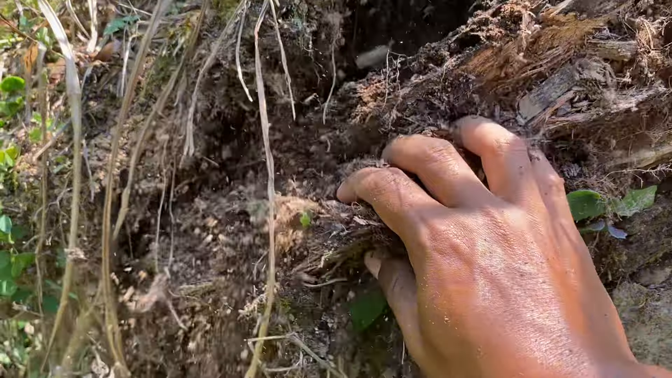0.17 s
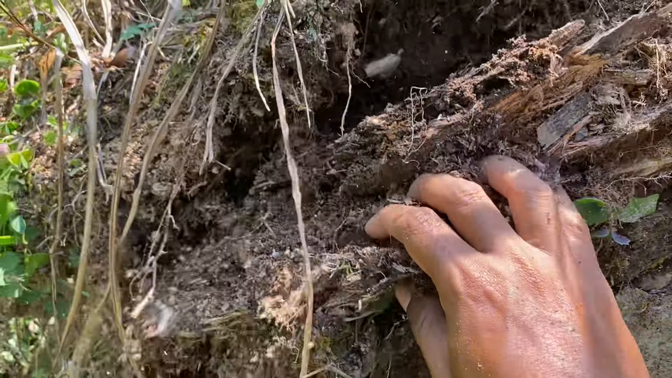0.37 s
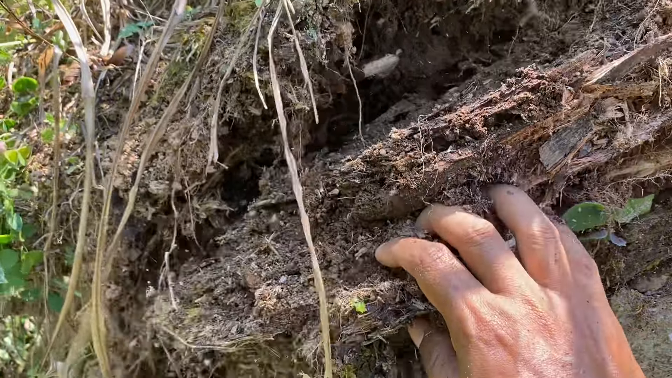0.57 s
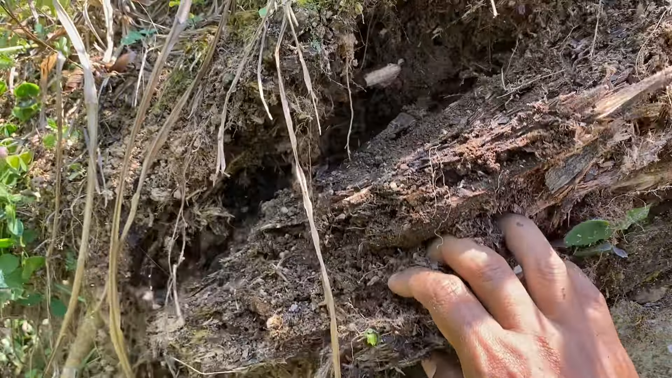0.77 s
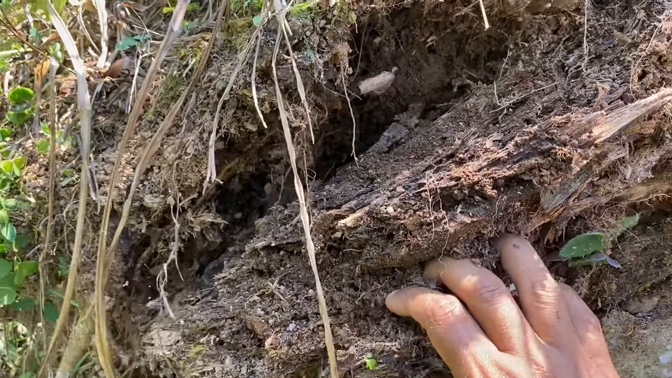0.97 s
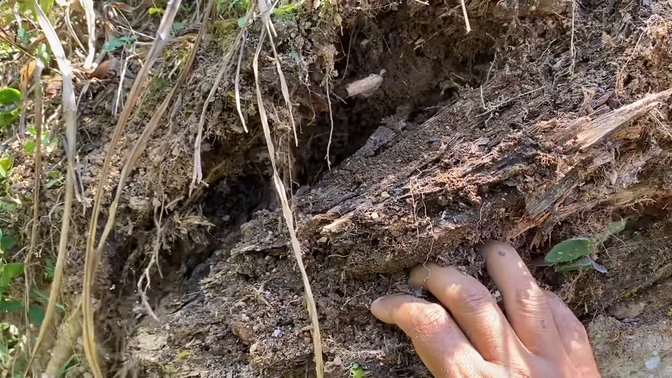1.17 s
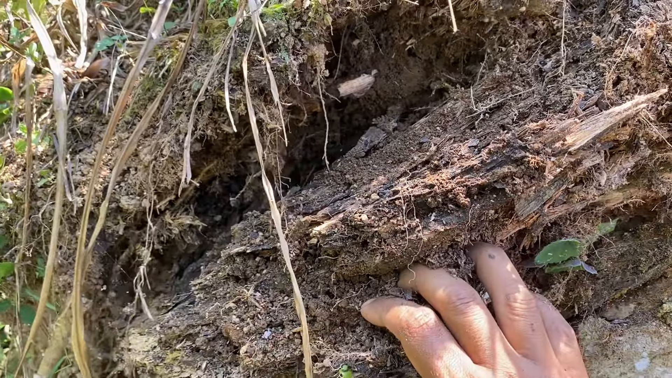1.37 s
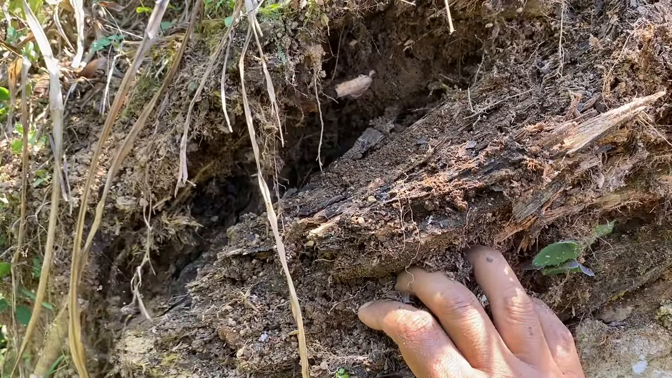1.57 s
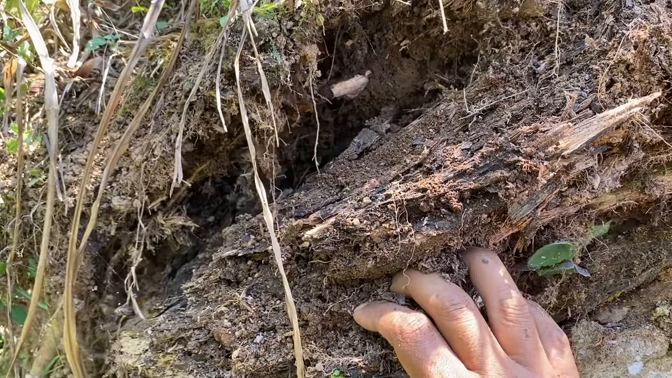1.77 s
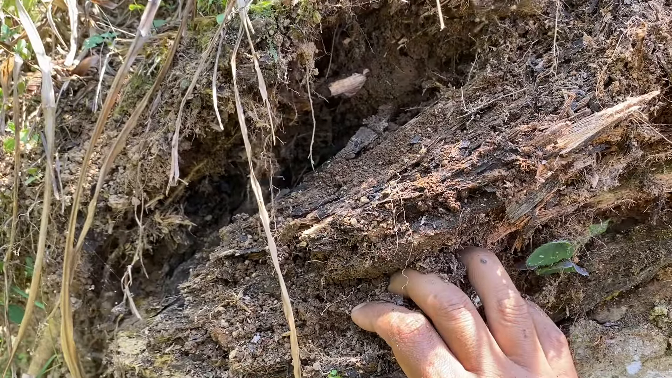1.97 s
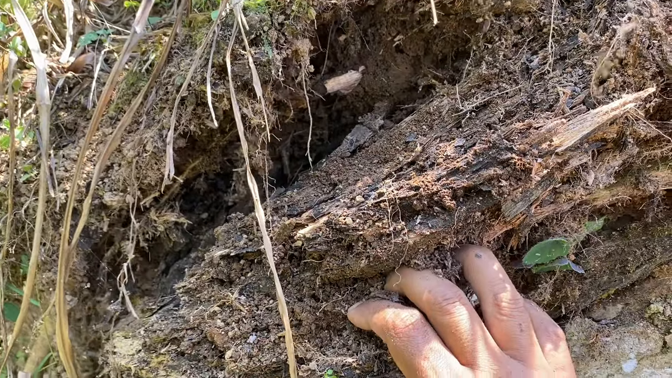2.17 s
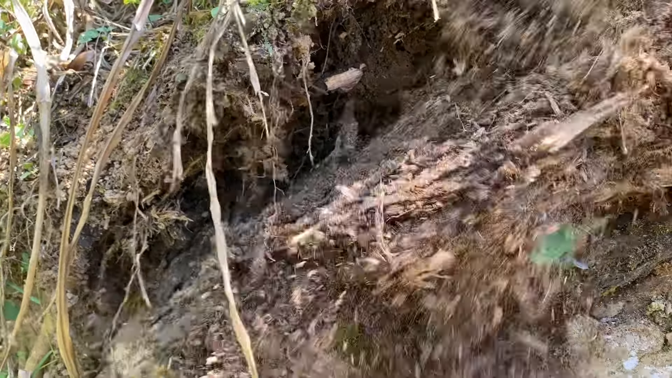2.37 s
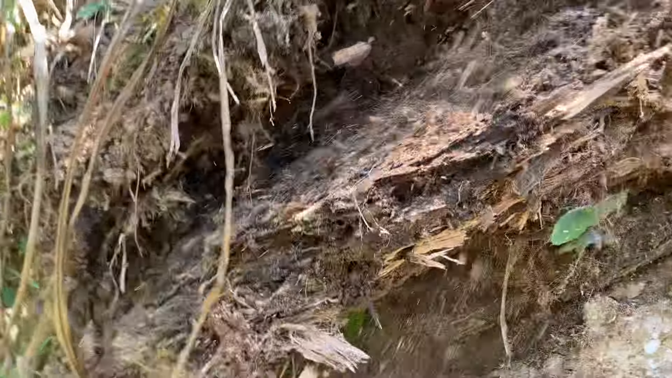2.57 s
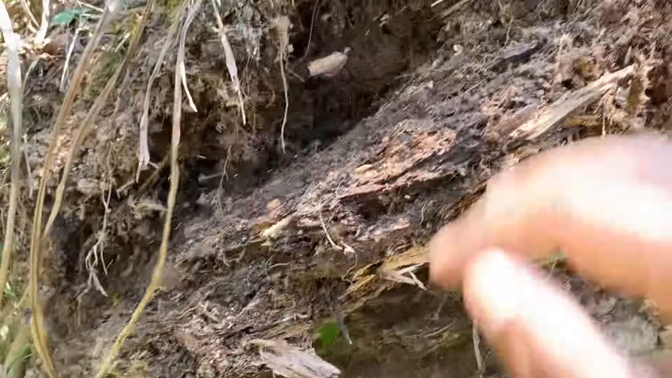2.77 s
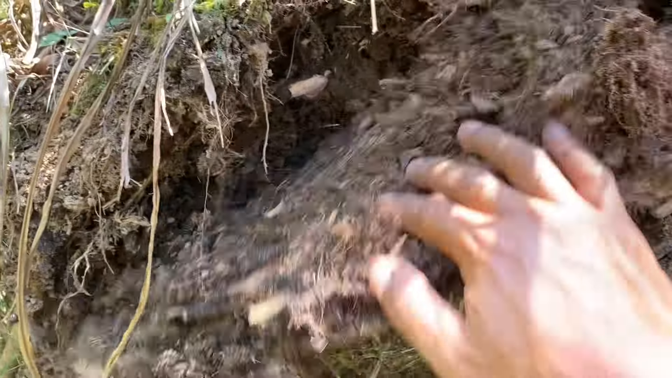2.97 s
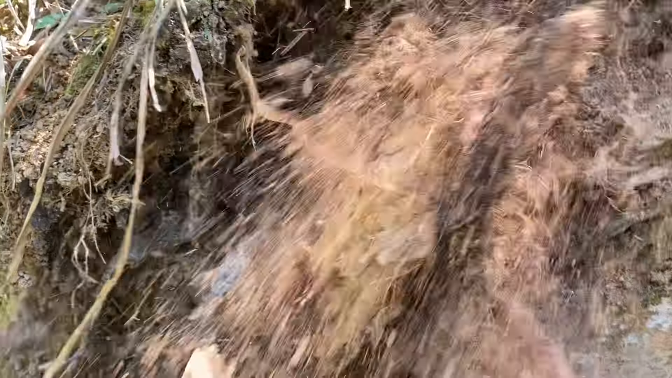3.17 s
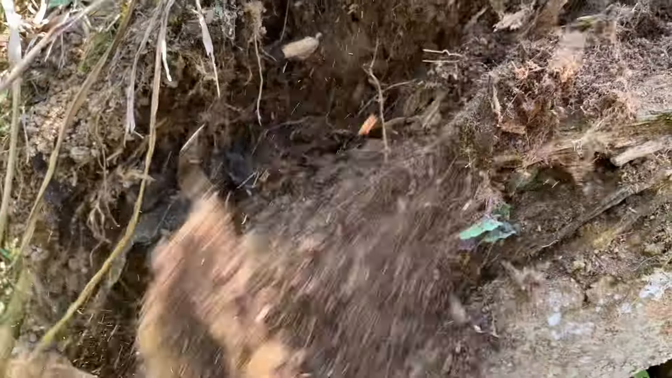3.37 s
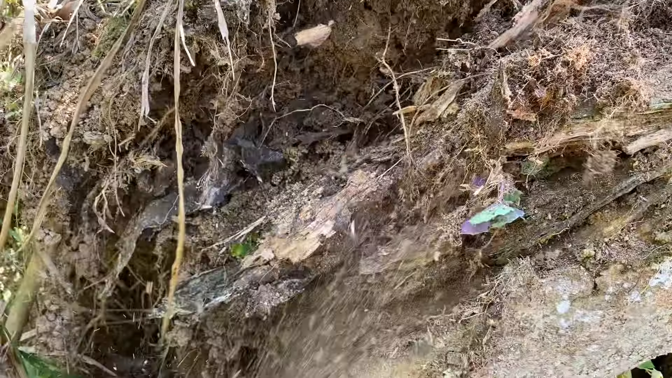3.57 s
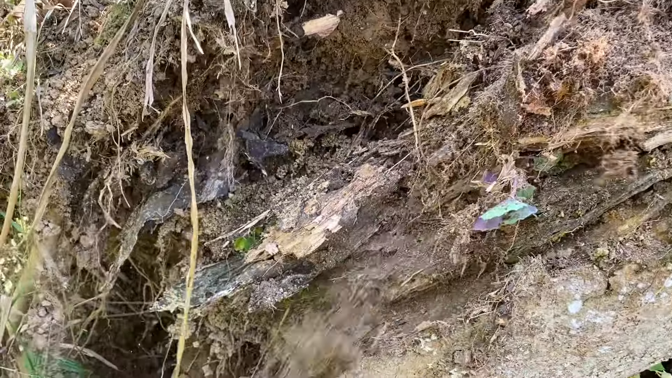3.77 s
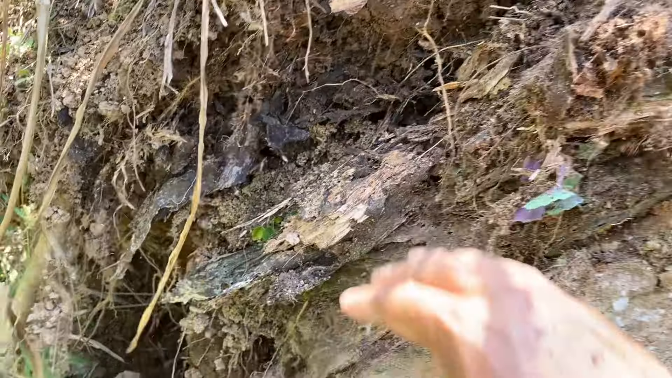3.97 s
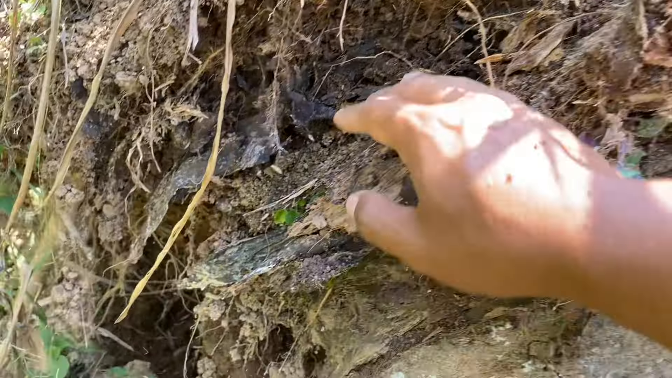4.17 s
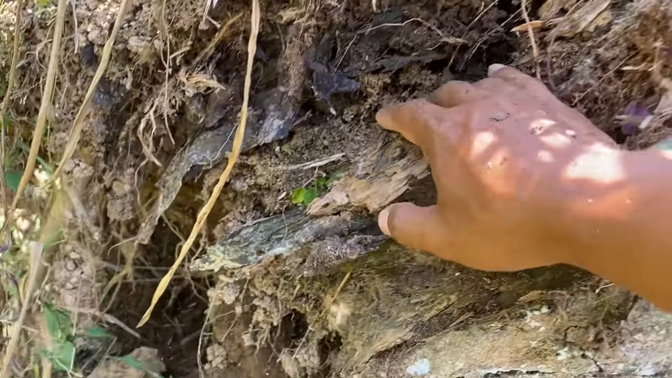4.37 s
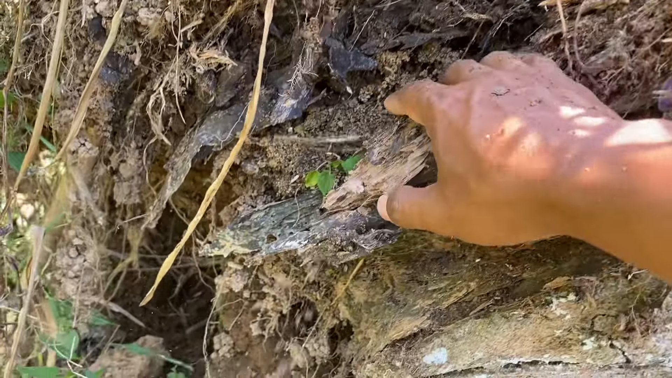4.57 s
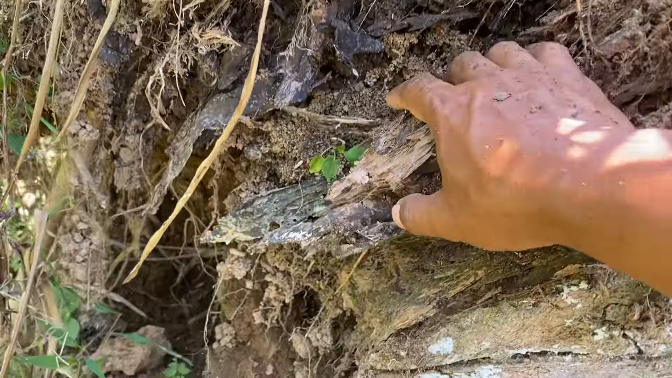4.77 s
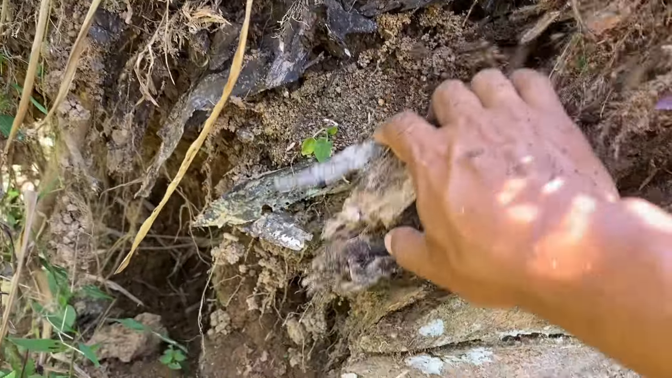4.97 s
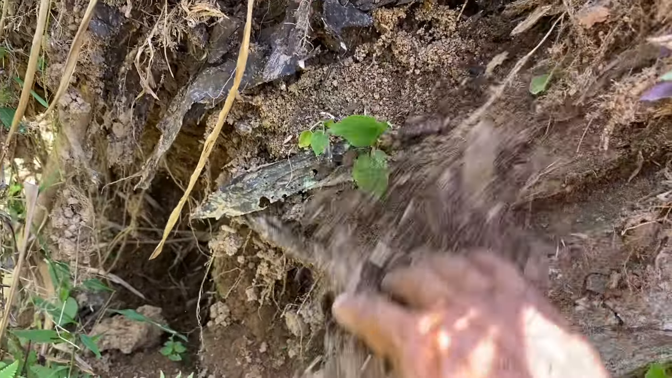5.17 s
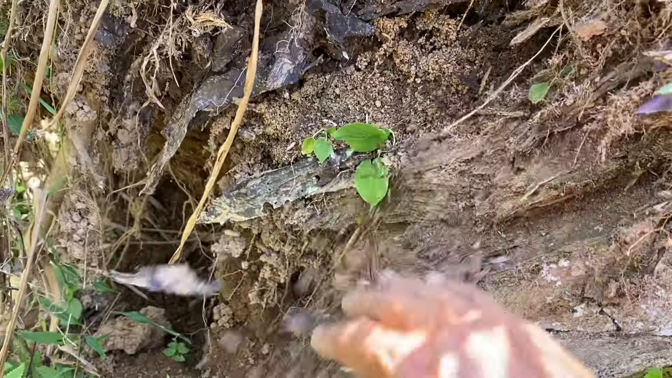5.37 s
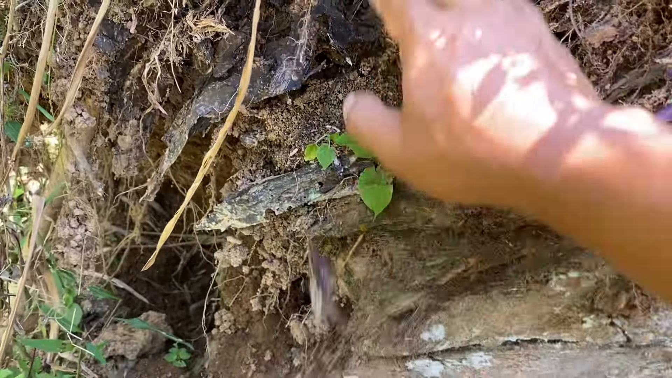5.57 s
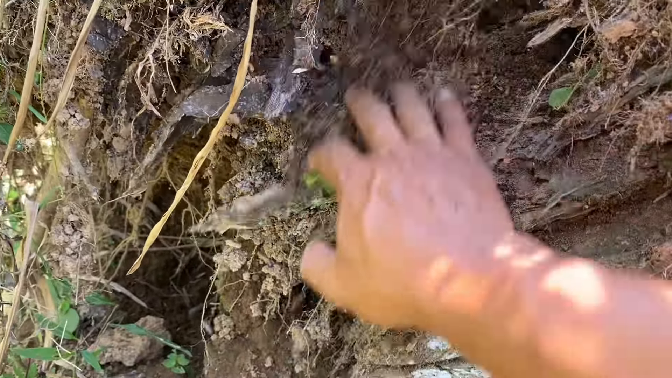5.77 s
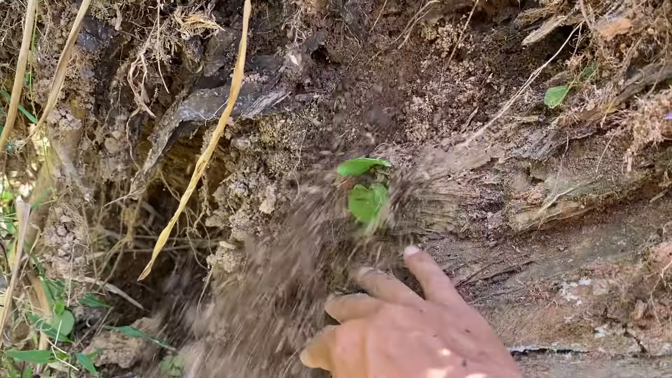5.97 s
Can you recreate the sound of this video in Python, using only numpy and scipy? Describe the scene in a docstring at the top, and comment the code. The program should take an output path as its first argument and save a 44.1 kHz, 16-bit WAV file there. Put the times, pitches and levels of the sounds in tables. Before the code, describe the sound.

Very close stereo sound of a hand digging at a dry earth bank outdoors. Fine soil trickles and small fibres tick, then nearly quiet with faint woody rubbing. At about 2.3 seconds a rotten slab cracks loudly with a short sinking thump. Crunchy breaking and sliding dirt follow, calm down, then a cluster of snaps around five seconds and a few lighter scrapes and spatters.

```python
"""Outdoors, at an earth bank of dry soil and rotten wood: a hand claws close to a pair of microphones.
Soil is showers of random contacts, coarse under the fingers, fine and lumpy as it runs down the slope.
Fibres snap as a ringing click with splinters; clods thud as swelling, damped noise in the soft earth.
A slab of wood rubs and breaks as trains of tiny fractures through its resonances, then slumps out
with a sinking thump. The bank throws it all back briefly, over still air."""
import sys
import numpy as np
from scipy import signal
from scipy.fft import rfft, irfft
from scipy.io import wavfile

SR = 44100
rng = np.random.default_rng(int(sys.argv[2]) if len(sys.argv) > 2 else 0)


def transcribe(u):
    """Save the signal u as a 16-bit wav file named by the first command-line argument.

    u: samples, shape (n,) or (channels, n), limited to [-1, 1]; the rate is SR.
    q: integer samples, one column per channel.
    """
    v = np.clip(np.atleast_2d(u).T, -1, 1)
    q = np.round(v * 32767).astype(np.int16)
    wavfile.write(sys.argv[1], SR, q)


N = 265041
TIME = np.arange(N) / SR

# strokes of the fingers through the soil:
# start t/s, length t/s, raking level/dB, fine soil let go level/dB, lumps let go level/dB
FINGER_STROKES = [(0, 0.0018, -55.5, -63.5, -65), (0.13, 0.047, -59, -76, -72),
                  (0.317, 0.13, -62, -67, -99), (0.68, 0.022, -63, -73.5, -88), (1.55, 0.95, -70, -85, -81),
                  (2.26, 0.11, -45, -51.5, -54), (2.435, 0.38, -56, -64, -74),
                  (2.599, 0.15, -54, -61, -68.5), (2.906, 0.097, -47.5, -59, -52.5),
                  (3.018, 0.089, -49.5, -55, -57.5), (3.208, 0.17, -51.5, -54.5, -69),
                  (3.404, 0.033, -46.5, -50, -68), (3.915, 0.058, -76, -57, -68.5),
                  (4.186, 0.11, -69.5, -64.5, -75.5), (4.322, 0.1, -65, -71, -75),
                  (4.722, 0.044, -61, -59.5, -67.5), (4.764, 0.13, -60.5, -73.5, -89),
                  (4.888, 0.033, -49, -66, -63), (5.0, 0.022, -50.5, -58, -61),
                  (5.085, 0.03, -52.5, -54.5, -69.5), (5.149, 0.026, -65, -56.5, -91),
                  (5.317, 0.19, -66, -64, -80.5), (5.686, 0.0215, -79, -59, -72.5),
                  (5.765, 0.11, -60.5, -60.5, -79), (5.995, 0.021, -91, -57, -89)]
# colour of the grit thrown by snaps and breaks: f/Hz, level/dB
GRIT_COLOUR = [(300, -18.5), (700, -8), (2000, -5), (3500, -15), (6500, -10), (8000, -17.5), (10000, -14),
               (15000, -14)]


def from_db(db):
    """Amplitude factor of a level in dB."""
    return 10 ** (np.asarray(db) / 20)


def rms_one(x):
    """Scale a sound to an rms of 1, both ports together."""
    return x / np.sqrt(np.mean(x ** 2) + 1e-20)


def in_time(rows):
    """Each column of a curve, sample by sample."""
    s, *columns = np.transpose(rows)
    return [np.interp(TIME, s, column) for column in columns]


def at_hz(points, hz):
    """A spectrum read on a log-frequency axis."""
    known_hz, values = np.transpose(points)
    return np.interp(np.log(hz), np.log(known_hz), values)


def butter(x, hz, kind, order=2):
    """Causal low-, high- or band-pass."""
    sos = signal.butter(order, np.clip(hz, 10, .45 * SR), kind, fs=SR, output="sos")
    return signal.sosfilt(sos, x + 1e-18)


def resonance(x, hz, width_hz):
    """One damped resonance, gain 1 on top; the wider it is, the sooner it dies."""
    r = np.exp(-np.pi * width_hz / SR)
    feed = np.array([1, 0, -1]) * (1 - r * r) / 2
    feedback = [1, -2 * r * np.cos(2 * np.pi * hz / SR), r * r]
    return signal.lfilter(feed, feedback, x + 1e-18)


def body(x, modes):
    """Resonances in parallel, signs alternating."""
    return sum((-1) ** k * from_db(db) * resonance(x, hz, width) for k, (hz, width, db) in enumerate(modes))


def coloured(x, spectrum):
    """Causal (minimum-phase) filter that follows a spectrum."""
    size = 2048
    level_db = at_hz(spectrum, np.fft.rfftfreq(size, 1 / SR) + 1)
    cepstrum = irfft(np.log(from_db(level_db)))
    # fold the cepstrum forward in time
    cepstrum[1:size // 2] *= 2
    cepstrum[size // 2 + 1:] = 0
    response = irfft(np.exp(rfft(cepstrum)))
    return signal.oaconvolve(x, response[None], axes=1)[:, :x.shape[1]]


def add(out, s, sound):
    """Mix a stereo sound in at a time."""
    start = int(round(s * SR))
    out[:, start:start + sound.shape[1]] += sound[:, :N - start]


def panned(x, left_db):
    """Lean a sound to the left by a level difference."""
    return x * from_db(np.array([[left_db], [-left_db]]) / 2)


def two_ports(pair, apart_hz, width=0.62):
    """Two unrelated signals as mid and side: close microphones hear the bass alike."""
    side = width * butter(pair[1], apart_hz, "high")
    return np.array([pair[0] + side, pair[0] - side])


def microcracks(size, per_s, spread_db):
    """Two trains of tiny fractures of uneven strength."""
    born = rng.random((2, size)) < per_s / SR
    sign = rng.choice([-1, 1], (2, size))
    return born * sign * from_db(spread_db * np.minimum(rng.exponential(1, (2, size)), 3.5))


def gesture(age_s, length_s, attack_share, t60):
    """Attack, hold and release of one movement; height 1."""
    attack = np.sin(np.pi / 2 * np.clip(age_s / (attack_share * length_s), 0, 1))
    return attack * from_db(-60 * np.clip((age_s - length_s) / t60, 0, 2))


def wander(size, rate_hz):
    """Slow chance, spread 1: noise low-passed at a rate."""
    settle = SR // 4
    return rms_one(butter(rng.standard_normal(size + settle), rate_hz, "low")[settle:])


def glide(pair, speed):
    """Shift the pitch of a stereo sound by a factor that changes from moment to moment."""
    return np.array([np.interp(np.cumsum(speed), np.arange(pair.shape[1]), side) for side in pair])


def outdoor_air():
    """Still air is steady coloured noise; moving air is a faint rumble, different at each port."""
    # f/Hz, level/dB
    air_colour = [(30, -15.5), (85, -2.5), (200, -7.5), (450, -18), (800, -16.5), (1400, -22),
                  (2100, -13.5), (3000, -27), (7500, -17.5), (10000, -36), (15000, -38.5)]
    air = coloured(two_ports(rng.standard_normal((2, N)), apart_hz=500), air_colour)
    draught = butter(rng.standard_normal((2, N)), [35, 130], "band")
    return from_db(-76) * rms_one(air) + from_db(-93) * rms_one(draught)


def grains(per_s, spread_db, spectrum, octaves, lead_s, scatter_s):
    """Random contacts, each with its own size, pitch and place (the left port leads by lead_s); rms 1."""
    band_edges = np.geomspace(31.25, 16000, 19)
    lowest_hz, highest_hz = spectrum[0][0], spectrum[-1][0]
    at = np.flatnonzero(rng.random(N) < per_s / SR)
    size = from_db(spread_db * np.minimum(rng.exponential(1, N)[at], 4))
    pitch = rng.uniform(np.log2(lowest_hz) - 1, np.log2(highest_hz) + 1, N)[at]
    lead = (lead_s + scatter_s * rng.uniform(-1, 1, N))[at]
    arrivals = at, np.clip(at + np.round(lead * SR).astype(int), 0, N - 1)
    out = np.zeros((2, N))
    for low, high in zip(band_edges, band_edges[1:]):
        # a contact sounds most in the bands near its own pitch
        share = np.exp(-((np.log2(low * high) / 2 - pitch) / octaves) ** 2) * rng.choice([-1, 1], N)[at]
        if high > lowest_hz / 2 and low < highest_hz * 2:
            impulses = np.array([np.bincount(a, size * share, N) for a in arrivals])
            out += butter(impulses, [low, high], "band")
    return rms_one(coloured(out, spectrum))


def debris_db(levels_db, t60, runoff_db):
    """Level of one kind of debris: what each stroke lets go, on top of the soil that keeps running."""
    # soil running between the strokes: t/s, level/dB
    running_soil = [(0.0, -66), (0.42, -64), (0.75, -65.5), (1.3, -74.5), (1.44, -79), (1.62, -73),
                    (2.24, -82), (2.41, -68), (2.49, -61), (3.05, -65), (3.18, -63), (3.43, -54),
                    (4.14, -64), (4.55, -64.5), (4.68, -65.5), (4.99, -62), (5.2, -65.5), (5.67, -64),
                    (6.01, -66.5)]
    power = from_db(in_time(running_soil)[0] + runoff_db) ** 2
    for (start_s, length_s, *_), level_db in zip(FINGER_STROKES, levels_db):
        stroke = gesture(TIME - start_s, length_s, attack_share=0.43, t60=t60)
        power = power + (from_db(level_db) * stroke) ** 2
    return 10 * np.log10(power)


def soil():
    """Crunch, knocking clods, tumbling, crumbs, spatters and a trickle that thickens as more soil runs."""
    # soil sliding away down the left of the slope: t/s, share (0-1)
    slide_curve = [(2.35, 0.1), (2.6, .6), (3.1, 0.54), (3.3, 0.7), (3.9, 0.87), (4.4, 0.47)]
    # colours of coarse soil, small clods, fine soil and lumps: f/Hz, level/dB
    raking_colour = [(250, -33.5), (600, -9), (1100, -3.5), (1700, -1.5), (2600, -3.5), (4000, -9.5),
                     (8000, -12), (15000, -28.5)]
    clod_colour = [(300, -13), (600, -2), (1200, -2.5), (2000, -3), (3500, -11.5)]
    trickle_colour = [(900, -20.5), (1500, -13), (2200, -3.5), (4000, -3.5), (6000, -6), (8000, -3.5),
                      (9500, -6.5), (12000, -7.5), (15500, -8)]
    tumbling_colour = [(35, -7), (80, 0), (160, -1.5), (350, 2), (600, -6), (1000, -3.5), (2000, -16.5)]

    _, _, coarse_db, fine_db, lumps_db = np.transpose(FINGER_STROKES)
    raking_db = debris_db(coarse_db, t60=0.47, runoff_db=-5)
    trickle_db = debris_db(fine_db, t60=0.19, runoff_db=-1.5)
    tumbling_db = debris_db(lumps_db, t60=0.57, runoff_db=-18.5)
    sliding, = in_time(slide_curve)

    # where the raking is quiet, its low part and the clods are thinned, increasingly from 2.3 to 3.5 s
    thinning = np.clip((-60.0 - raking_db) / 10, 0, 1) * np.interp(TIME, [2.3, 3.5], [.2, 1])
    raking = grains(1400, 2.1, raking_colour, octaves=1.74, lead_s=0.00046 * sliding, scatter_s=.00025)
    raking = np.sqrt(1 - thinning) * raking + np.sqrt(thinning) * butter(raking, 2300, "high")
    raking = from_db(raking_db - 1.5) * raking

    clods = grains(130, 2.2, clod_colour, octaves=.7, lead_s=.0002, scatter_s=.0003)
    clods = from_db(raking_db - 10.5) * (1 - thinning) * clods

    # louder trickling brings more contacts a second
    flow = from_db(.6 * (trickle_db - np.mean(trickle_db)))
    trickle = grains(3800 * flow, 1.3, trickle_colour, octaves=1.0, lead_s=0.00037, scatter_s=.00025)
    trickle = from_db(trickle_db + 2.5) * rms_one(trickle / np.sqrt(flow))
    crumbs = grains(260, 2.9, trickle_colour, octaves=.45, lead_s=.0002, scatter_s=.0004)
    crumbs = from_db(trickle_db - 2.5) * crumbs

    tumbling = grains(600, 1.9, tumbling_colour, octaves=0.96, lead_s=0.00016 * sliding, scatter_s=0.00028)
    tumbling = from_db(tumbling_db - 1.5) * tumbling

    patter = spatters(rise_s=0.0012, width=0.74)
    # all but the dull tumbling leans left as the soil slides
    lean = from_db(np.outer([1, -1], 0.54 + 2.7 * sliding) / 2)
    return (raking + clods + trickle + crumbs + patter) * lean + tumbling


def thuds(swell_cycles, width):
    """Soft earth yields over a few cycles, so the lowest thuds swell slowest and stay longest."""
    # clods and loose wood knocking against the bank: t/s, level/dB, pitch of the body f/Hz
    knocks = [(.003, -60.5, 440), (.171, -63.5, 307), (0.244, -66, 376), (0.649, -67.5, 352),
              (0.794, -65, 360), (1.617, -56, 1000), (1.689, -64, 380), (2.296, -40, 406),
              (2.305, -22.5, 836), (2.3067, -20.5, 1473), (2.32, -39.5, 259), (2.361, -51, 219),
              (2.502, -51.5, 361), (2.629, -43.5, 690), (2.679, -36.5, 750), (2.948, -38.5, 352),
              (3.024, -47.5, 364), (3.067, -41, 359), (3.108, -57, 334), (3.185, -50.5, 366),
              (3.497, -67, 292), (3.545, -61.5, 154), (3.784, -71, 300), (3.911, -59.5, 320),
              (4.072, -63.5, 645), (4.268, -70, 400), (4.734, -62.5, 337), (4.768, -76, 401.4),
              (4.835, -71, 520), (4.898, -49, 447), (4.963, -55, 410), (5.006, -58.5, 433),
              (5.302, -63, 310), (5.606, -65.5, 376), (5.907, -64, 690)]
    out, t = np.zeros((2, N)), TIME[:SR // 3]
    for s, level_db, hz in knocks:
        age = t * hz / swell_cycles
        push = age * np.exp(1 - age)
        # a clod rings hollowly around one pitch, heavily damped
        force = push * two_ports(rng.standard_normal((2, len(t))), apart_hz=800)
        thud = resonance(resonance(force, hz, width * hz), hz, 55 + 0.033 * hz)
        thud = panned(rms_one(thud), left_db=2.8 * min(hz / 900, 1) ** 2)
        add(out, s, from_db(level_db) * thud * np.sqrt(np.mean(push ** 2)))
    return out


def snaps(splinter_t60, warning_s, parting_s, scatter, softness):
    """A fibre crackles, parts with one ringing click and a few last strands, then throws splinters."""
    # fibres, rootlets and splinters: t/s, level/dB, pitch f/Hz,
    # width of the ring (share of its pitch), splinter level/dB, grit level/dB
    fibres = [(.0573, -41, 2610, 0.63, -22, -8), (.157, -38, 2320, .5, -7, -8),
              (.181, -42, 2200, 0.55, -9, -10), (.217, -39.5, 2320, 0.21, -16, -18),
              (0.3535, -31, 2620, 0.18, -26, -22), (0.405, -35, 1630, 0.54, -21, -9),
              (0.4195, -32, 1790, 0.73, -8, -12), (0.4368, -33.5, 1230, 0.54, -17, -9),
              (0.6837, -32, 2380, 0.3, -24, -16), (0.7053, -39.5, 2020, .6, -15, -8),
              (0.854, -33, 4080, 1, -1.5, 0), (1.2103, -35.5, 7500, 0.65, -28, -1),
              (1.2535, -36.5, 5460, 0.94, -5, -10), (1.358, -57, 2160, 0.24, 8.5, -3),
              (1.546, -45, 2240, 0.94, 6, 4.5), (1.642, -46, 2030, .15, -3, -18),
              (1.721, -47.5, 1890, 0.75, -2, -6), (1.826, -50.5, 2100, 0.082, -4, -19),
              (1.968, -42.5, 6200, 0.13, -2, -3), (2.111, -46, 2000, 0.061, -13, -30),
              (2.179, -27.5, 2116, 0.48, -9, 0), (2.2339, -26.5, 2790, 0.31, -9, 4),
              (2.306, -14.5, 2400, 1, -16, -5), (2.3605, -30, 1500, 0.67, -12, -6),
              (2.3875, -28, 2500, .8, -5, -5), (2.9345, -25, 2170, 0.55, -5, -13),
              (2.971, -26.5, 970, 0.23, -16, -16), (3.071, -18.5, 5700, 0.38, -10, -6),
              (3.294, -34, 1440, 0.1, -13, -24), (3.323, -27, 2330, 0.56, -14, -9),
              (3.3647, -30, 1900, 0.93, -3, -5), (3.428, -34, 1930, .6, -7, -11),
              (3.495, -26.5, 3560, 0.67, -11, -12), (3.5444, -28, 2660, 1, -16, -10),
              (3.575, -36, 2300, 0.44, -15, -28), (3.8593, -30.5, 5600, 0.2, -12, -23.5),
              (4.372, -27.5, 1910, 1, -9, 3), (4.4207, -48, 1100, 0.76, -10, -4),
              (4.47, -31, 1500, 1, -20, 3.5), (4.733, -39, 1760, 0.15, -1.5, -25),
              (4.759, -44, 1760, .2, -6, -18), (4.87, -39, 2240, .5, -13, -12),
              (4.8958, -29, 2200, 0.42, -0.5, -20), (4.9088, -24.5, 2880, 0.34, -7, -16),
              (4.9257, -18, 2600, 0.45, -14, -16), (4.963, -23.5, 1940, 0.77, -4.5, -13),
              (4.9921, -27, 1780, 0.2, -8.5, -9), (4.9913, -30, 8100, 0.055, -23, -30),
              (5.004, -30.5, 8200, 0.033, -22, -30), (5.0063, -25.5, 1750, 0.26, -3.5, -13),
              (5.019, -32, 1900, .4, -7, -12), (5.0471, -26.5, 1880, 0.32, -4.5, -8),
              (5.0715, -26, 1720, 0.29, -5.5, -12), (5.105, -27.5, 1610, 0.35, -2, -11),
              (5.1319, -24, 1700, .5, -14, -11), (5.138, -13.5, 2120, 0.41, -21, -24),
              (5.1615, -33, 2000, 0.57, -1, -14), (5.183, -37, 7940, 0.099, -10, -21),
              (5.3, -37, 2900, 0.3, -7, -14), (5.366, -30, 4270, 0.6, -3, -4),
              (5.4372, -32.5, 5630, 0.15, -23, -18), (5.498, -47, 1600, 0.07, -16, -24),
              (5.5608, -26.5, 2720, 0.28, -30, -26), (5.8526, -29, 2750, 0.78, 0.5, 10),
              (5.909, -28.5, 2110, 0.53, -2, -6)]
    out, before = np.zeros((2, N)), SR // 50
    t = TIME[:SR // 8] - TIME[before]  # the fibre parts at t = 0
    away_s = np.abs(t)
    strain = np.where(t < 0, np.exp(-away_s / warning_s), from_db(-60 * away_s / splinter_t60))
    for s, level_db, hz, width, splinter_db, grit_db in fibres:
        splinters = rms_one(two_ports(microcracks(len(t), 8300, 2.13), apart_hz=900, width=0.68))
        strands = microcracks(len(t), 1500, 0.28) * (t > 0) * np.exp(-away_s / parting_s)
        crackle = from_db(splinter_db - 18.5) * strain * splinters + from_db(-6.5) * strands
        force = np.vstack([t == 0, crackle])
        ring = butter(resonance(force[:1], hz, width * hz), hz / softness, "low")
        # the splinters' pitch is spread more widely than the click's
        chips = resonance(force[1:], hz, (width + scatter) * hz) * np.sqrt(width / (width + scatter))
        crack = np.vstack([ring, chips]) + from_db(grit_db) * coloured(force, GRIT_COLOUR)
        crack = butter(butter(crack, 740, "high"), 13930, "low")
        click, spray = crack[0], crack[1:]
        add(out, s + t[0], from_db(level_db - 7.5) * (click + spray) / np.abs(click).max())
    return out


def spatters(rise_s, width):
    """A clump of dry soil bursts on landing into a short, bright patter of separate crumbs."""
    # landings: t/s, level/dB, t60 t/s, centre of the patter f/Hz
    landings = [(.155, -55, .12, 2200), (0.704, -59, 0.062, 2600), (1.234, -57.5, .07, 5000),
                (2.622, -43.5, 0.076, 3000), (3.238, -46.5, 0.088, 5500), (3.316, -37, 0.045, 4960),
                (3.336, -39.5, 0.11, 5000), (3.426, -45.5, 0.15, 4500), (3.956, -50, 0.19, 4000),
                (5.701, -43.5, 0.057, 5430), (5.716, -43.5, 0.055, 7000), (5.805, -46, 0.053, 2180),
                (5.833, -61, .05, 2800)]
    out, t = np.zeros((2, N)), TIME[:SR // 4]
    for s, level_db, t60, hz in landings:
        crumbs = two_ports(microcracks(len(t), 2200, 1.7), apart_hz=900)
        patter = rms_one(resonance(crumbs, hz, width * hz))
        add(out, s, from_db(level_db - 2.5 - 60 * t / t60) * (1 - np.exp(-t / rise_s)) * patter)
    return out


def rubbing(waver, catch_db):
    """The slab sticks and slips, crackling and ringing hollowly; pitch and pressure shift with the grip."""
    # slips in its bed: start t/s, length t/s, level/dB, pitch (factor on the resonances)
    bed_slips = [(0.981, 0.04, -75, 0.86), (1.048, .03, -75.5, 0.9), (1.113, 0.045, -78, 0.79),
                 (1.603, 0.038, -66, 1.21), (1.633, 0.024, -65, 0.89), (1.649, 0.27, -72, 1.01),
                 (1.778, 0.034, -63.5, 0.96), (1.809, 0.025, -74, 0.9), (1.976, 0.15, -75.5, 0.97),
                 (2.019, 0.017, -65, 0.94), (2.069, 0.022, -66, 0.95), (2.231, 0.031, -58, 1.14),
                 (2.394, 0.55, -64, 1.055), (2.607, 0.018, -55.5, 1.02), (2.653, 0.048, -51, 0.99),
                 (4.031, 0.11, -78, 0.81)]
    # resonances of the slab as it rubs: f/Hz, width f/Hz, level/dB
    rub_modes = [(370, 55, -6), (780, 60, 0), (1400, 300, -24), (2060, 110, -11.5)]
    out = np.zeros((2, N))
    for s, length_s, level_db, pitch in bed_slips:
        cracks = two_ports(microcracks(SR, 600, 2.4), apart_hz=1300)
        bend, grip = wander(SR, rate_hz=25), wander(SR, rate_hz=45)
        ringing = rms_one(glide(body(cracks, rub_modes), pitch * (1 + waver * bend)))
        crackle = from_db(-10.5) * rms_one(butter(cracks, [1800, 7000], "band"))
        pull = gesture(TIME[:SR], length_s, attack_share=0.18, t60=0.12)
        pull = pull * rms_one(from_db(catch_db * grip))
        add(out, s, from_db(level_db) * pull * (ringing + crackle))
    return out


def breaks(rise_s, detune):
    """An avalanche of fractures rings the loose piece and the slab, and sprays grit."""
    # wood and clods giving way: t/s, level/dB, t60 t/s, pitch of the piece f/Hz, slab level/dB
    failures = [(2.2734, -41.5, 0.048, 900, -16), (2.2866, -30, 0.037, 895, 5),
                (2.2934, -26, 0.07, 2000, -8.5), (2.3058, -26, 0.023, 2530, -1),
                (2.308, -18, 0.02, 810, -3.5), (2.3224, -32, 0.083, 2340, -8), (2.932, -39, 0.077, 695, 12),
                (2.944, -40.5, 0.092, 360, 3), (2.954, -39, .05, 945, -11), (2.988, -49, .2, 665, 7),
                (3.018, -44, 0.44, 744, -1), (3.056, -38, .1, 1290, 4), (3.067, -33.5, 0.075, 636, -6),
                (3.071, -36, 0.068, 1900, -2), (3.093, -39, 0.043, 940, -8), (3.132, -48, 0.035, 553, -6),
                (3.1876, -44.5, 0.066, 820, -4.5), (3.287, -49.5, 0.071, 1400, 2),
                (3.338, -51, 0.03, 1110, -6), (3.35, -47, 0.043, 1500, 2), (3.441, -54, 0.078, 760, -10),
                (3.5, -63, 0.028, 805, -11), (4.369, -61, 0.04, 970, 2), (4.777, -58.5, .09, 640, -6),
                (4.79, -65, 0.054, 1150, -6), (4.963, -49, 0.056, 840, -7), (5.006, -47, .035, 900, -8),
                (5.076, -52, 0.043, 720, -8), (5.101, -51, 0.041, 714, -8), (5.869, -57, 0.15, 676, -7)]
    # resonances of the rotten slab as it breaks: f/Hz, width f/Hz, level/dB
    slab_modes = [(614, 50, -2), (820, 68, -0.5), (1408, 81, -3), (2015, 46, -2.5), (2585, 1300, -24.5)]
    out, t = np.zeros((2, N)), TIME[:SR // 4]
    for s, level_db, t60, hz, slab_db in failures:
        surge = from_db(-60 * t / t60) * (1 - np.exp(-t / rise_s))
        force = two_ports(microcracks(len(t), 9000, 0.67), apart_hz=1500) * surge
        piece = rms_one(resonance(force, hz, 0.2 * hz))
        # a long crumbling break sprays more grit: 0.5 dB more per doubling of its t60
        grit_db = -9.5 + 0.5 * np.log2(10 * t60)
        grit = rms_one(coloured(force, GRIT_COLOUR))
        # the slab rings a little differently each time
        pitch = 1 + detune * rng.uniform(-0.93, 1)
        slab = rms_one(body(force, [(mode_hz * pitch, width, db) for mode_hz, width, db in slab_modes]))
        crunch = piece + from_db(slab_db) * slab + from_db(grit_db) * grit
        add(out, s, from_db(level_db) * rms_one(crunch) * np.sqrt(np.mean(surge ** 2)))
    return panned(out, left_db=1.0)


def slump(s, level_db, start_hz, end_hz, sink_s, rise_s, t60):
    """The slab comes out of the earth with one thump that sinks in pitch as more soil gives way."""
    out, t = np.zeros((2, N)), TIME[:SR // 4]
    force = two_ports(rng.standard_normal((2, len(t))), apart_hz=1500)
    boom = butter(force, [.6 * start_hz, 1.4 * start_hz], "band")
    hz = end_hz + (start_hz - end_hz) * np.exp(-t / sink_s)
    push = from_db(-60 * t / t60) * (1 - np.exp(-t / rise_s))
    thump = rms_one(push * glide(boom, hz / start_hz))
    add(out, s, from_db(level_db) * thump * np.sqrt(np.mean(push ** 2)))
    return out


def bank(x, near_t60, far_t60, far_db, wet_db, count=6):
    """Near earth throws sound straight back, roots farther off add a faint tail; both vary by spot."""
    t, wet = TIME[:SR // 6], np.zeros((2, N))
    spot = TIME * 45  # spots passed, 45 a second, cycling through count of them
    near, far = from_db(-60 * t / near_t60), from_db(far_db - 60 * t / far_t60)
    fading = np.hypot(near, far) * (t > .0006)
    for k in range(count):
        here = np.sqrt(np.clip(1 - np.abs((spot - k) % count - 1), 0, 1))
        tail = two_ports(rng.standard_normal((2, len(t))), apart_hz=690, width=0.91) * fading
        tail = butter(tail, 740, "high") / np.sqrt(np.sum(tail ** 2) / 2)
        wet += signal.oaconvolve(x * here, tail, axes=1)[:, :N]
    return x + from_db(wet_db) * wet


def scene():
    """All the digging, in front of the bank, over still outdoor air."""
    digging = soil()
    digging = digging + thuds(swell_cycles=0.88, width=0.39)
    digging = digging + snaps(splinter_t60=0.063, warning_s=0.0066, parting_s=0.0016,
                              scatter=.35, softness=0.35)
    digging = digging + rubbing(waver=.06, catch_db=2.0)
    digging = digging + breaks(rise_s=0.00036, detune=.05)
    digging = digging + slump(s=2.309, level_db=-33.5, start_hz=450, end_hz=76,
                              sink_s=.012, rise_s=0.0037, t60=0.17)
    return bank(digging, near_t60=.02, far_t60=0.1, far_db=-9.5, wet_db=-1.5) + outdoor_air()


def record(dry):
    """The microphone loses the deepest bass and steps down above 8 kHz, the left port a little more."""
    heard = coloured(butter(dry, 37, "high"), [(100, 0.5), (8000, -0.5), (9200, -8.0), (15000, -12.0)])
    left = coloured(heard[:1], [(2000, 0.41), (6500, 0.795), (9000, -1.16)])
    heard = np.vstack([left, heard[1:]])
    # the top is cut steeply at 15.9 kHz
    return signal.sosfilt(signal.ellip(10, .2, 70, 15900, fs=SR, output="sos"), heard)


dry = scene()
out = record(dry)
transcribe(out)
```